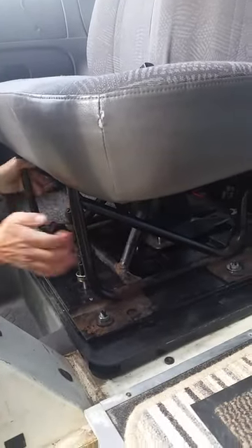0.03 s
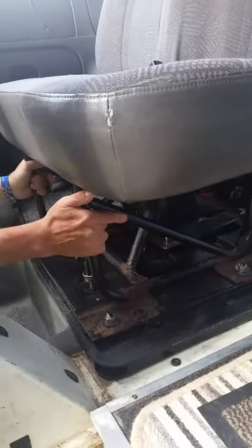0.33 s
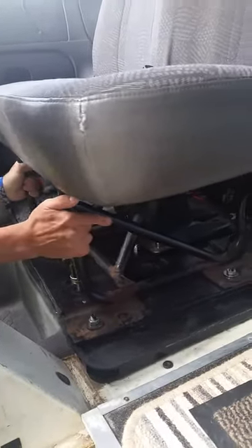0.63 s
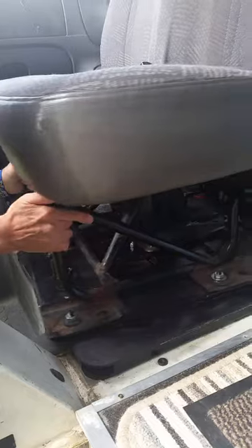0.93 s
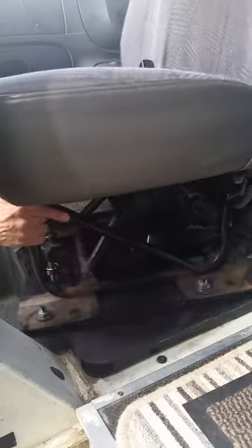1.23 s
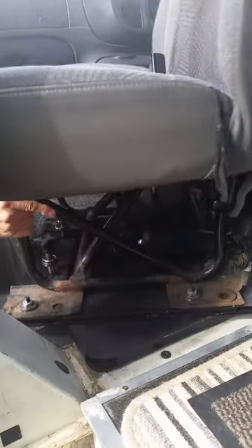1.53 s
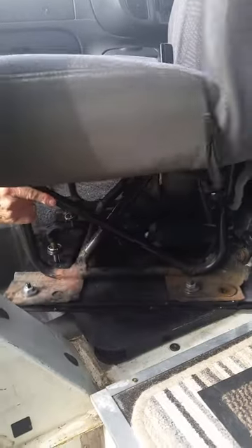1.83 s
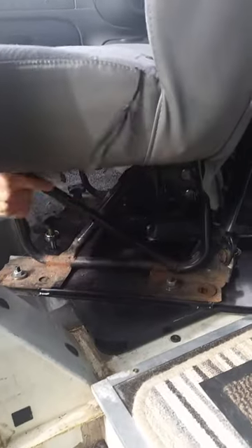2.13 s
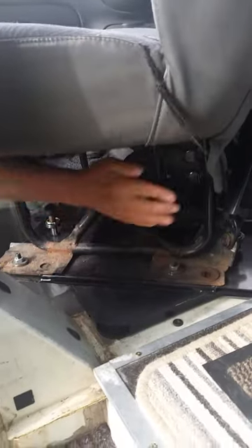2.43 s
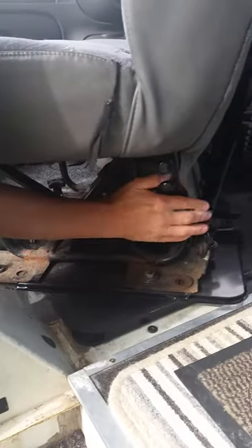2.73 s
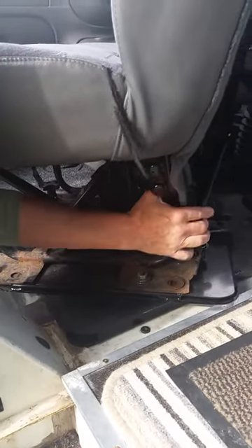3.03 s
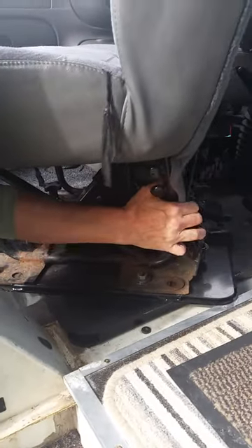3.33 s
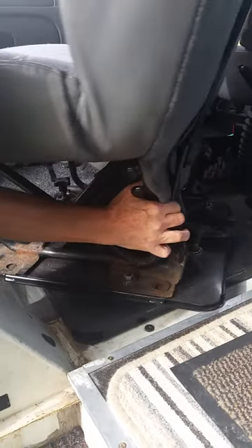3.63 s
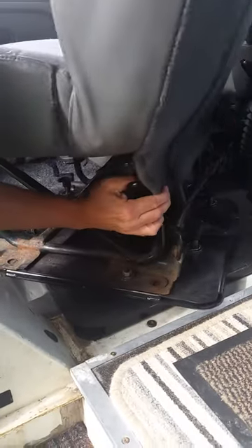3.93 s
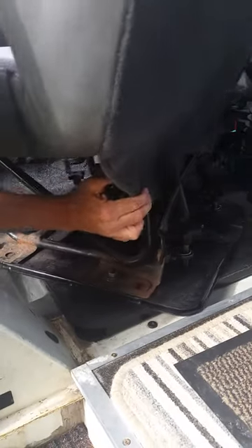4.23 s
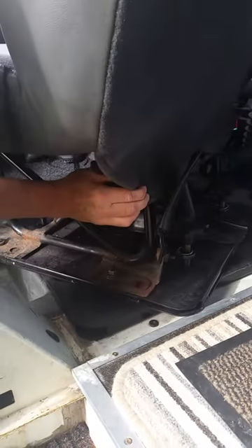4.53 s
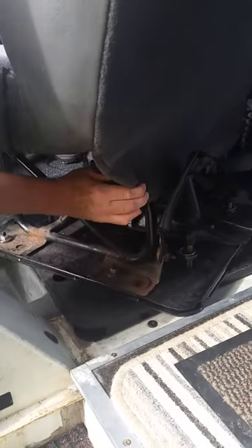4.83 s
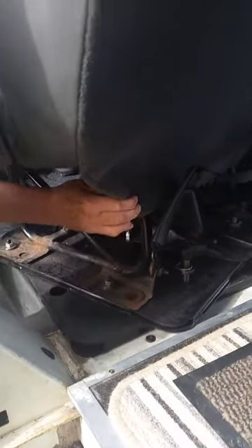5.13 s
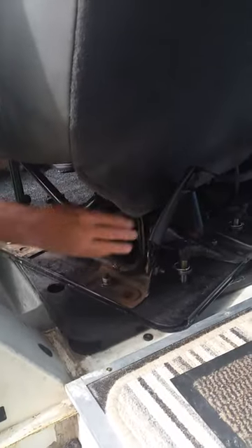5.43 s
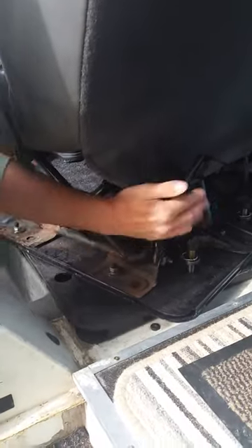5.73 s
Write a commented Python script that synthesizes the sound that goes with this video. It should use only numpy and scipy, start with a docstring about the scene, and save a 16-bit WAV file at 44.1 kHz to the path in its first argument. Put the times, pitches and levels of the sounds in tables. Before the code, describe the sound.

Metal plates scrape and clank twice over as a van seat is swivelled by hand inside a quiet cabin.

```python
"""A van seat is turned by hand on its steel swivel base, in two pushes, in a small padded cabin.
First the plates start to grind and hiss over each other, with a few light knocks. Near 1.6 s the
loose frame catches and drops with a loud clank, grit cracks and the seat thumps into the floor.
After a lull, the second push builds from about 3.7 s and clanks hardest near 4.4 s.
Last come a short squeak and one more scrape, which fades into the quiet of the cabin."""
import sys
import numpy as np
from scipy import signal
from scipy.fft import rfft, irfft, next_fast_len
from scipy.io import wavfile

SR = 44100
rng = np.random.default_rng(int(sys.argv[2]) if len(sys.argv) > 2 else 0)


def wrap_up_sound(samples):
    """Save the sound to the file named by the first command line argument, as 16-bit audio."""
    columns = np.atleast_2d(samples).T
    # keep every value between -1 and 1, then stretch to whole-number steps
    tamed = np.clip(columns, -1, 1)
    steps = np.round(tamed * 32767).astype(np.int16)
    wavfile.write(sys.argv[1], SR, steps)


N = 255339


# Shoves of the hands: hardest moment t/s, swell t/s, fade t/s, grinding level/dB, rubbing level/dB
SHOVES = [(.55, .3, 0.39, -70, -81), (1.411, 0.65, 1, -52, -59), (2.02, 0.23, 0.22, -45, -48.5),
          (2.319, 0.13, .22, -55.5, -58.5), (3.06, 0.41, 0.6, -72, -78.5), (3.772, 0.36, .18, -49.5, -56),
          (4.062, 0.18, 0.44, -46.5, -52.5), (4.309, 0.17, 0.27, -39, -51), (4.749, 0.72, 0.48, -50.5, -62),
          (5.241, 0.26, 0.16, -46.5, -54.5), (5.48, 0.26, 0.14, -73, -67.5)]

def shoving():
    """Grinding and rubbing levels in dB over time: shoves overlap on top of a light, steady lean."""
    t = np.arange(0, N, 64) / SR
    grind, rub = from_db(-82), from_db(-88)  # the steady lean
    for peak_s, swell_s, fade_s, grind_db, rub_db in SHOVES:
        lag_s = 0.15 * swell_s  # the plate grinds first and hisses once it slides
        grind = np.hypot(grind, from_db(grind_db) * swell(t - peak_s, swell_s, fade_s))
        rub = np.hypot(rub, from_db(rub_db) * swell(t - peak_s - lag_s, swell_s, fade_s))
    return [np.interp(np.arange(N) / SR, t, 20 * np.log10(gain)) for gain in (grind, rub)]


def swell(since_s, swell_s, fade_s, depth_db=19, roundness=1.22):
    """One shove rises to a strength of 1 and falls away."""
    away = np.abs(since_s) / np.where(since_s < 0, swell_s, fade_s)
    return from_db(-depth_db * np.minimum(away, 10) ** roundness)


# Tone of the grinding: f/Hz, level/dB
GRIND_TONE = [(140, -31), (270, 5.5), (350, -2), (570, 3), (720, -5.5), (950, -5), (1300, -17),
              (2300, -15.5), (3700, -24.5), (5000, -38), (8000, -52.5)]
# Notes the steel base rings at: f/Hz, level/dB, ring t/s (to fall by 60 dB)
BASE_NOTES = [(389.5, -3.5, 0.091), (461, -6, 0.18), (539.3, -8, 0.27), (922, -7, .08), (1000, -4.5, .08),
              (1186, 2, 0.049)]

def grinding(grind_db):
    """The plate catches and slips on three spots, each with its own path through the base."""
    out = 0
    for _ in range(3):
        catching = from_db(grind_db - 1.5) * slips(per_s=500, spread_db=3, surge_db=3.5, surge_hz=21)
        out += play(catching, body(GRIND_TONE, BASE_NOTES, notes_db=-14, ring_scale=0.59))
    return out


# Steel hits steel: t/s, thud level/dB, clank level/dB, ring level/dB, clank f/Hz
# (each level is relative to its own column)
KNOCKS = [(0.279, -58, -66, -63.5, 835), (.538, -70, -52.5, -83, 374), (1.052, -48, -39.5, -72, 417),
          (1.215, -66, -46, -51, 845), (1.54, -56.5, -40, -41, 800), (1.634, -29, -16.5, -25, 854),
          (1.645, -18.5, -38, -23.5, 1170), (1.656, -17, -31.5, -19, 1210), (1.666, -24, -24.5, -46, 420),
          (1.723, -29, -28.5, -39.5, 756), (1.897, -33, -40, -69, 810), (1.967, -43, -30, -23.5, 1140),
          (2.011, -44, -28.5, -28.5, 880), (2.094, -29.5, -28.5, -43, 690), (2.197, -44.5, -44.5, -71, 620),
          (3.042, -44.5, -49.5, -82, 420), (3.33, -48.5, -54.5, -67.5, 780), (3.797, -38, -36, -47, 636),
          (3.964, -52, -35.5, -68, 600), (4.057, -56, -27.5, -38.5, 527), (4.075, -35.5, -23.5, -38.5, 720),
          (4.112, -39, -27.5, -64, 700), (4.229, -55, -26, -31, 570), (4.334, -28, -25.5, -35, 695),
          (4.371, -16, -23.5, -28, 696), (4.574, -47, -40, -50, 700), (4.673, -37, -45, -56, 620),
          (5.133, -37.5, -32.5, -53.5, 486)]
# Tones of the floor's thud, the base's clank and the frame's ring: f/Hz, level/dB
THUD_TONE = [(25, 0), (45, -2.5), (80, 0), (120, -9), (190, 1.5), (290, -16.5), (450, -5.5), (900, -64.5)]
CLANK_TONE = [(130, -30.5), (250, 19), (400, -1.5), (650, -0.5), (900, 7.5), (1300, -15), (2000, -36.5),
              (4000, -38.5)]
RING_TONE = [(600, -9), (1300, 2), (2300, -8), (4000, -7.5), (4600, -16.5), (6400, -12), (8000, 2.5),
             (16000, -36)]
# Notes of the floor and of the frame: f/Hz, level/dB, ring t/s
FLOOR_NOTES = [(42.3, 0, 0.14), (65.4, 4, 0.07), (115.8, 3, 0.23), (182, -6, 0.17)]
FRAME_NOTES = [(1522, -1.2, .11), (1787, -2, .11), (2360, -1, .11), (2120, -0.77, 0.086), (2546, 0, 0.029),
               (3327, 0.77, .09), (4153, 0, .09)]

def knocks(spots=3):
    """Each knock shakes the floor, the base and the frame, landing on a few spots in turn."""
    out = 0
    for spot in range(spots):
        times, thud_db, clank_db, ring_db, clank_hz = np.transpose(KNOCKS[spot::spots])
        ring_hz = 2.84 * clank_hz  # a harder hit raises both pitches
        thud = blows(times, thud_db + 24.5, chatter=0.3, chatter_s=0.008)
        clank = blows(times, clank_db + 13.5, chatter=0.82, chatter_s=0.018, hz=clank_hz, focus=3.1)
        ring = blows(times, ring_db + 22, chatter=1, chatter_s=0.011, hz=ring_hz, focus=1.6)
        ring = softened(ring, hz=4480)  # painted steel gives a little
        out += play(thud, body(THUD_TONE, FLOOR_NOTES, notes_db=1, ring_scale=0.96, snap=2.6))
        out += play(clank, body(CLANK_TONE, BASE_NOTES, notes_db=-6, ring_scale=0.73, snap=4.2))
        out += play(ring, body(RING_TONE, FRAME_NOTES, notes_db=-13.5, ring_scale=0.4, snap=1.8))
    return out


# The seat rocks on its base: t/s, relative level/dB, f/Hz
THUMPS = [(.425, -55.5, 105), (.547, -44, 150), (.586, -48.5, 99), (0.979, -45.5, 171), (1.689, -33, 95),
          (1.804, -29.5, 99), (1.851, -36, 48), (2.963, -46.5, 129), (4.425, -31.5, 45), (4.493, -42, 130)]

def thumps():
    """The weight of the seat lands softly and moves only the floor."""
    times, db, hz = np.transpose(THUMPS)
    landing = blows(times, db + 14.5, chatter=0.45, chatter_s=0.009, hz=hz, focus=0.82)
    return play(landing, body(THUD_TONE, FLOOR_NOTES, notes_db=0, ring_scale=0.71, snap=1.98))


# Tone of the shaking floor: f/Hz, level/dB
RUMBLE_TONE = [(25, -9), (45, -6), (75, 1), (115, -1.5), (195, 1), (260, -15), (400, -18.5), (800, -71)]

def rumble(grind_db):
    """The scraping shakes the floor, more strongly as the grinding grows."""
    level_db = -45.5 + 0.65 * (grind_db + 51.5)
    shaking = slips(per_s=2700, spread_db=3.44, surge_db=2.5, surge_hz=13)
    floor = body(RUMBLE_TONE, FLOOR_NOTES, notes_db=-24.5, ring_scale=0.74)
    return from_db(level_db) * play(shaking, floor)


# Tone of dry steel sliding: f/Hz, level/dB
RUB_TONE = [(700, -5), (1500, 11), (2700, 1.5), (3600, 13), (4500, 1), (5400, -9), (6500, -16.5), (8200, 2),
            (9500, -3.5), (11000, 5.5), (12500, -7), (15500, 0)]

def rubbing(rub_db):
    """The plates hiss a little unevenly as they slide."""
    return from_db(rub_db + 0.87 * drift(35)) * stereo_noise(RUB_TONE)


# Grit breaks between the plates: t/s, relative level/dB
CRACKS = [(.279, -70), (0.429, -70.5), (1.54, -54.5), (1.634, -42), (1.647, -33.5), (1.658, -43),
          (3.772, -53.5), (4.076, -37.5), (4.676, -59)]
# Tone of a crack: f/Hz, level/dB
CRACK_TONE = [(2000, -24), (3800, 12), (5200, 6), (6500, -0.5), (8000, 10.5), (11000, -8.5), (13000, -25),
              (16000, -10)]

def cracks():
    """Crushed grit gives short, bright bursts."""
    times, db = np.transpose(CRACKS)
    crushing = blows(times, db + 22.5, chatter=0.66, chatter_s=0.0034)
    return play(crushing, blurred_ring(CRACK_TONE, ring_scale=0.67, snap=0.68))


def squeak(middle_s=4.835, half_s=0.027, hz=883, sag_hz_per_s=340):
    """The plate sticks and slips so evenly that it briefly sings one wavering, sinking note."""
    t = np.arange(N) / SR - middle_s
    pitch_hz = (hz - sag_hz_per_s * t) * (1 + 0.015 * drift(76))
    phase = 2 * np.pi * np.cumsum(pitch_hz) / SR
    held = np.exp(-(t / half_s) ** 4 / 2)
    return from_db(-51) * held * np.sin(phase + LEFT_RIGHT / 2)


# Rough patches on the plate: middle t/s, half length t/s, middle f/Hz, width f/Hz, level/dB
SWISHES = [(0.763, 0.048, 3830, 250, -68), (2.328, 0.02, 3700, 1800, -54), (4.047, 0.056, 7800, 1800, -56),
           (5.28, 0.041, 8500, 2000, -61.5)]

def swishes():
    """A passing rough patch makes a narrow hiss that swells and fades."""
    out, hiss, t = 0, stereo_noise(RUB_TONE), np.arange(N) / SR
    for middle_s, half_s, hz, width_hz, db in SWISHES:
        band = signal.lfilter(*signal.iirpeak(hz, hz / width_hz, fs=SR), hiss)
        out += from_db(db) * rms_one(band) * np.exp(-((t - middle_s) / half_s) ** 2 / 2)
    return out


def rattle(grind_db):
    """Loose parts tap softly on the frame as the plate grinds."""
    taps = from_db(grind_db - 15.5) * slips(per_s=40, spread_db=0.5, surge_db=6.5, surge_hz=9)
    frame = body(RING_TONE, FRAME_NOTES, notes_db=-9, ring_scale=0.4, snap=1.5)
    return play(softened(taps, hz=1640), frame)


# Tones of the still cabin and of a faint hiss: f/Hz, level/dB
CABIN_TONE = [(25, 0.5), (140, -6), (190, -0.5), (255, -31), (500, -22), (1000, -26), (2600, -40)]
HISS_TONE = [(1500, -20.5), (2700, -18.5), (3400, 4.5), (3900, 1.5), (4600, -15), (5500, -30.5),
             (7000, -29), (8400, -31.5), (9600, -21), (10800, 0), (12500, -23.5), (14000, -8.5),
             (16000, -19.5)]

def quiet_cabin():
    """A low murmur and a faint, high hiss lie under everything."""
    return from_db(-67) * stereo_noise(CABIN_TONE) + from_db(-74.5) * stereo_noise(HISS_TONE)


# How alike left and right are: f/Hz, likeness (1 = the same, 0 = unrelated)
LIKENESS = [(130, .985), (270, .9), (520, .65), (1000, .15), (4000, .05)]
# How much louder the left is than the right: f/Hz, level/dB
BALANCE = [(100, -1), (260, 4), (520, -0.7), (2000, -0.5), (4000, 3.5), (8000, 8), (12000, 7.5)]
LEFT_RIGHT = np.array([[1], [-1]])

def spread(mid, side, tone, hz):
    """Mix two noises into left and right with a given tone: lows alike, highs unrelated."""
    alike = np.clip(at_hz(LIKENESS, hz), -1, 1)
    gain = from_db(at_hz(tone, hz) + LEFT_RIGHT * at_hz(BALANCE, hz) / 2)
    return gain * (np.sqrt(1 + alike) * mid + np.sqrt(1 - alike) * side * LEFT_RIGHT)


def stereo_noise(tone):
    """Steady noise with a given tone, fading out at the very top and bottom."""
    size = next_fast_len(N)
    hz = np.maximum(np.fft.rfftfreq(size, 1 / SR), 1)
    mid, side = rfft(rng.standard_normal((2, size)))
    edge_loss = np.sqrt(1 + (hz / tone[-1][0] / 1.2) ** 8) * np.sqrt(1 + (20 / hz) ** 4)
    return rms_one(irfft(spread(mid, side, tone, hz) / edge_loss)[:, :N])


# How long seat and cabin ring, before each part's ring_scale: f/Hz, ring t/s
RING_TIMES = [(40, 0.73), (150, 0.16), (500, 0.085), (1500, 0.32), (4000, 0.053), (12000, 0.22)]

def blurred_ring(tone, ring_scale, snap=0, size=12288):
    """Countless notes and echoes blur and die away; snap lifts the first instant."""
    t, out = np.arange(size) / SR, 0
    white = rng.standard_normal((2, 2, size))  # neighbouring bands get unrelated noise
    onset = snap * np.exp(-t / 0.00088)
    edges_hz = np.geomspace(24, 17000, 25)
    for k, (low, high) in enumerate(zip(edges_hz, edges_hz[1:])):
        hz = np.sqrt(low * high)
        fade = from_db(-60 * t / (ring_scale * at_hz(RING_TIMES, hz)))
        band = signal.butter(2, [low, high], "band", fs=SR, output="sos")
        mid, side = signal.sosfilt(band, white[k % 2] * (fade + onset))
        out += np.sqrt(high - low) * spread(rms_one(mid), rms_one(side), tone, hz)
    return unit_energy(out)


def clear_ring(notes, size=12288):
    """A few clear notes die away; the higher ones reach left and right out of step."""
    t, out = np.arange(size) / SR, 0
    for hz, db, ring_s in notes:
        apart = np.arccos(np.clip(at_hz(LIKENESS, hz), -1, 1)) * LEFT_RIGHT / 2
        out += from_db(db - 60 * t / ring_s) * np.sin(2 * np.pi * hz * t + apart)
    return unit_energy(out)


def body(tone, notes, notes_db, ring_scale, snap=0):
    """How a part answers one tap: clear notes on top of a blurred ring."""
    return unit_energy(blurred_ring(tone, ring_scale, snap) + from_db(notes_db) * clear_ring(notes))


def play(force, response):
    """Every jolt in the force sets the part ringing."""
    return signal.oaconvolve(force[None], response, axes=1)[:, :N]


def blows(times, levels_db, chatter, chatter_s, hz=None, focus=1, size=2048):
    """Each blow is a sharp hit and a dying chatter; where it lands favours pitches near its hz."""
    force, t = np.zeros(N + size), np.arange(size) / SR
    for k, (start_s, db) in enumerate(zip(times, levels_db)):
        small_hits = rng.standard_normal(size) * (rng.random(size) < 0.1)
        contact = chatter * unit_energy(small_hits * np.exp(-t / chatter_s))
        contact[0] += 1
        if hz is not None:
            contact = signal.lfilter(*signal.iirpeak(hz[k], focus, fs=SR), contact)
        start = round(start_s * SR)
        force[start:start + size] += from_db(db) * unit_energy(contact)
    return force[:N]


def slips(per_s, spread_db, surge_db, surge_hz):
    """Rough spots catch and let go at random, in surges."""
    sizes = from_db(spread_db * np.minimum(rng.exponential(1, N), 4)) * rng.choice([-1, 1], N)
    slipping = rng.random(N) < per_s / SR
    return rms_one(sizes * slipping * from_db(surge_db * drift(surge_hz)))


def softened(force, hz):
    """A soft touch loses the highs above hz."""
    return signal.sosfilt(signal.butter(4, hz, fs=SR, output="sos"), force + 1e-18)


def drift(hz, step=40):
    """A smooth random wobble of about 1 either way; more hz makes it quicker."""
    memory = np.exp(-2 * np.pi * hz * step / SR)
    noise = rng.standard_normal(N // step + 2002)
    slow = signal.lfilter([1], [1, -2 * memory, memory ** 2], noise)[2000:]
    return np.interp(np.arange(N) / step, np.arange(len(slow)), rms_one(slow))


def at_hz(points, hz):
    """Read between a table's rows, with octaves evenly spaced."""
    row_hz, value = np.transpose(points)
    return np.interp(np.log(hz), np.log(row_hz), value)


def from_db(db):
    """Turn decibels into a multiplier."""
    return 10 ** (np.asarray(db) / 20)


def rms_one(x):
    """Scale to an average strength (rms) of 1."""
    return x / np.sqrt(np.mean(x ** 2) + 1e-20)


def unit_energy(x):
    """Scale a response so white noise passes through at the same level."""
    return rms_one(x) / np.sqrt(x.shape[-1])


def scene():
    """The turning seat over the quiet cabin."""
    background = quiet_cabin()
    grind_db, rub_db = shoving()
    turning = rumble(grind_db) + grinding(grind_db) + rubbing(rub_db) + rattle(grind_db)
    return turning + knocks() + thumps() + cracks() + swishes() + squeak() + background


def record(dry, cutoff_hz=15800):
    """The very highest sounds are cut off steeply."""
    return signal.sosfilt(signal.ellip(16, 0.1, 80, cutoff_hz, fs=SR, output="sos"), dry)


dry = scene()
out = record(dry)
wrap_up_sound(out)
```